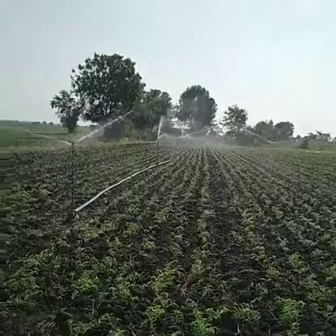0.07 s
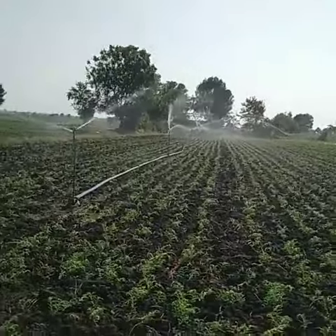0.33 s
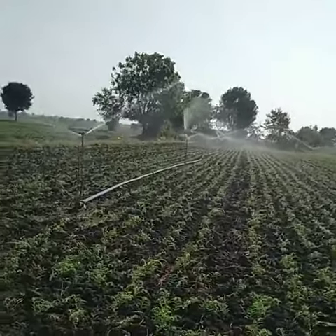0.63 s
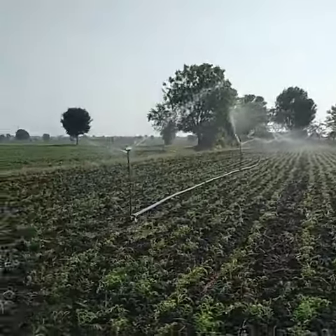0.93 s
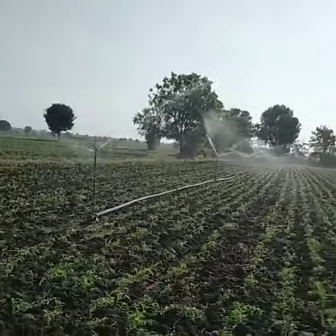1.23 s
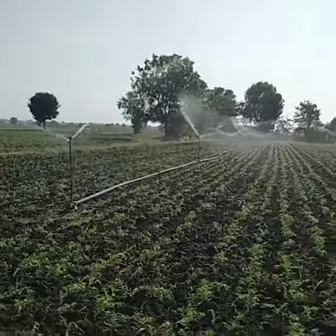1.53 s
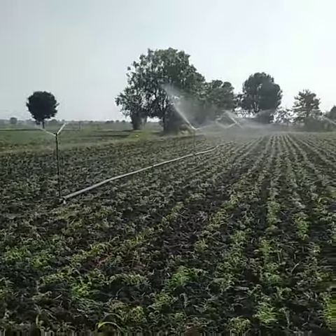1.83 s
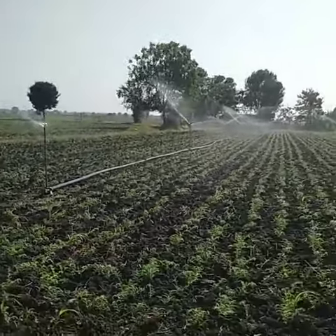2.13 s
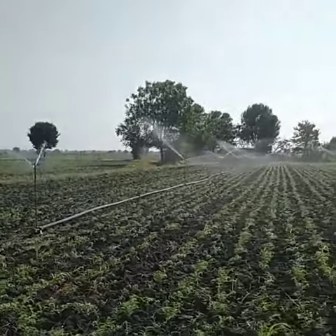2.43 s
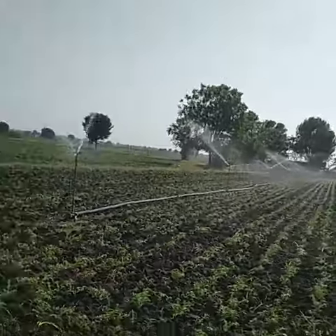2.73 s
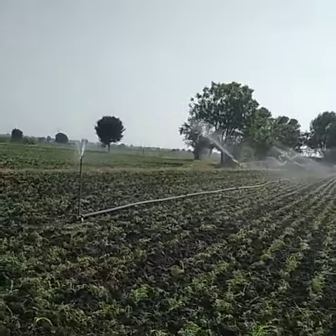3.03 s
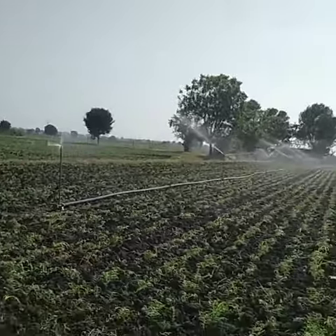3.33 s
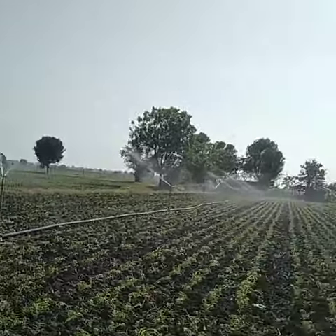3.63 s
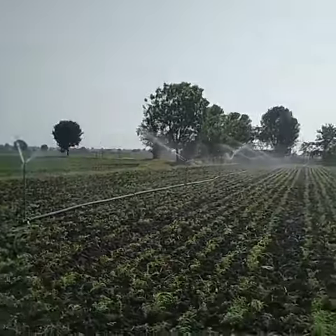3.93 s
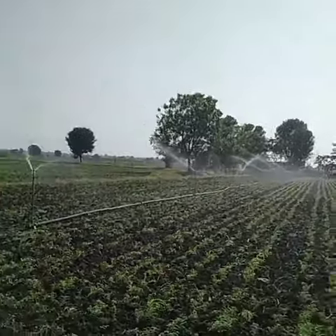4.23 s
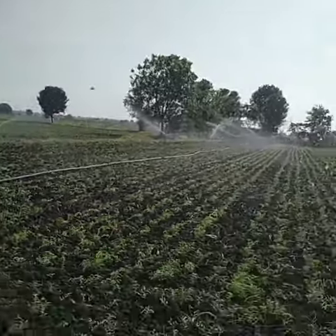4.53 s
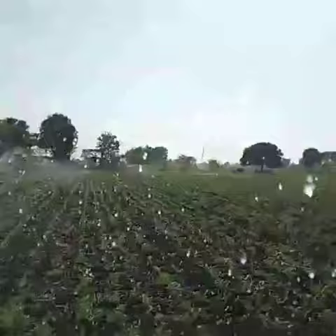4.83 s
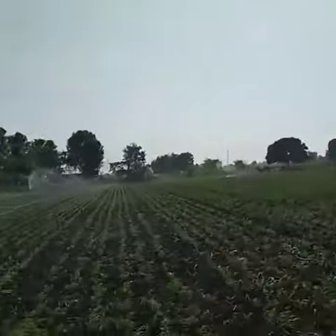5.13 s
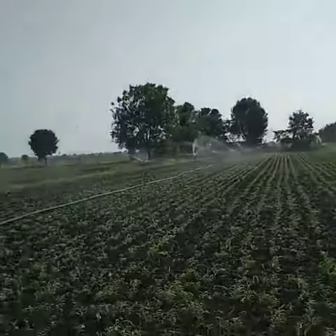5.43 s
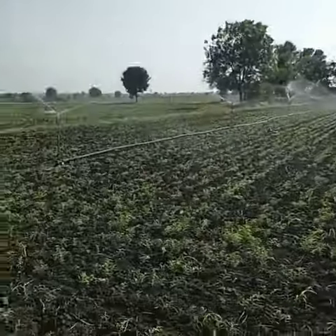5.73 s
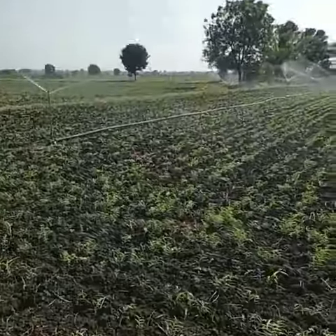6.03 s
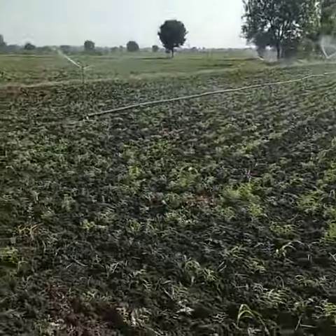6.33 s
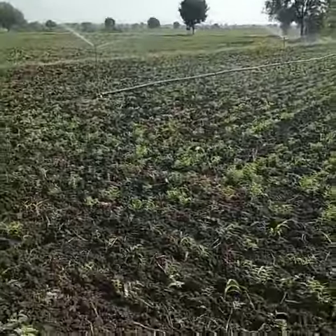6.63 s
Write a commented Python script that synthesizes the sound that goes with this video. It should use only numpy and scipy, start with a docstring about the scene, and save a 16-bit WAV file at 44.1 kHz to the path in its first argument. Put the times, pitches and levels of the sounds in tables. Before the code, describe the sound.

Outdoors in a crop field, gusts of wind rumble and thump on the microphone. Beneath them a sprinkler ticks about four times a second, each tick followed by a short spurt of spray, over a faint wash from distant sprinklers. Later a jet sweeps past, pattering on the leaves, and a few big drops land right by the microphone. The patter fades, with soft rustles and one more gust.

```python
"""Gusts of wind rumble on the microphone while an impact sprinkler chops away over a crop field.
Its swing arm slaps into the jet about four times a second, each slap followed by a burst of spray,
over the smooth wash of the far sprinklers. A jet sweeps past, pattering on the leaves, and a few
big drops land very close with a thud and a sharp tick. Soft rustles and one faint plop sit underneath."""
import sys
import numpy as np
from scipy import signal
from scipy.fft import rfft, irfft, next_fast_len
from scipy.io import wavfile
from scipy.ndimage import uniform_filter1d

SR = 44100
rng = np.random.default_rng(int(sys.argv[2]) if len(sys.argv) > 2 else 0)


def master_out(mix):
    """Clip the mix to full scale and print it as 16-bit PCM to the path in sys.argv[1]."""
    frames = np.transpose(np.atleast_2d(mix))
    ceiling = np.clip(frames, -1, 1)
    pcm = np.round(ceiling * 32767).astype(np.int16)
    wavfile.write(sys.argv[1], SR, pcm)


N = 303849
TIME = np.arange(N) / SR


def amp(db):
    """Decibels to gain."""
    return 10 ** (np.asarray(db) / 20)


def unit(x):
    """Scales to an rms of one."""
    return x / np.sqrt(np.mean(x ** 2) + 1e-20)


def add(mix, start_s, sound):
    """Lays a sound into the mix."""
    part = mix[round(start_s * SR):][:len(sound)]
    part += sound[:len(part)]


def colour(x, spectrum):
    """Equalises x with a curve of (Hz, dB) points on a log-frequency axis, to an rms of one."""
    size = next_fast_len(len(x), True)
    hz, db = np.transpose(spectrum)
    curve_db = np.interp(np.log(np.fft.rfftfreq(size, 1 / SR) + 1), np.log(hz + 1), db)
    return unit(irfft(rfft(x, size) * amp(curve_db), size)[:len(x)])


def noise(spectrum):
    """Coloured noise at an rms of one."""
    return colour(rng.standard_normal(N), spectrum)


def drift(hz):
    """A random wobble at an rms of one, up to about hz changes a second."""
    size = next_fast_len(N, True)
    lowpass = np.exp(-(np.fft.rfftfreq(size, 1 / SR) / hz) ** 2)
    return unit(irfft(rfft(rng.standard_normal(size)) * lowpass, size)[:N])


def swell(peak_s, half_width_s):
    """A bell-shaped fade in and out."""
    return np.exp(-2 * np.minimum(((TIME - peak_s) / half_width_s) ** 2, 20))


def impacts(per_s, spread_db, size=N):
    """A random train of impulses: many small, a few large."""
    height = amp(spread_db * np.minimum(rng.exponential(1, size), 4))
    return unit(height * rng.choice([-1, 1], size) * (rng.random(size) < per_s / SR))


def passing_jet_gain():
    """The water from a sweeping jet grows louder until it is nearest, then dies away."""
    nearest_s, peak_db = 5.104, -44.5
    approach_db_per_s, retreat_db_per_s = 7.5, 11.2
    before, after = np.maximum(nearest_s - TIME, 0), np.maximum(TIME - nearest_s, 0)
    return amp(peak_db - approach_db_per_s * before - retreat_db_per_s * after)


# The tone of the far sprinklers and the open field. Each row: frequency in Hz, relative level in dB.
FIELD_EQ = [(30, 16), (105, 5.5), (135, 7.5), (280, -3.5), (500, 3), (800, 1), (1150, 2.5), (1500, 0.5),
            (2100, 3.5), (2800, -3), (5500, -8), (7000, -9), (8000, -3.5), (9500, -7), (14000, -10)]


def field_wash():
    """Far spray merges into a wash, which swells as the jet passes and its core splashes on the soil."""
    far_spray = amp(-61)
    jet_core = amp(-52) * swell(peak_s=4.97, half_width_s=0.23)
    jet_spray = amp(-15) * passing_jet_gain()
    level = np.sqrt(far_spray ** 2 + jet_core ** 2 + jet_spray ** 2)
    return noise(FIELD_EQ) * level * amp(1.36 * drift(hz=24.9))


# The dull and the bright layer of a rustle. Each row: frequency in Hz, relative level in dB.
SCUFF_EQ = [(150, 2), (600, 3.5), (1200, 2.5), (2200, -7.5), (3500, -13.5), (8000, -20)]
HISS_EQ = [(1500, -5), (2200, -2), (5500, -2), (8200, 5.5), (11000, 5), (14000, 0)]
# Soft rustles close by. Each row: peak time in seconds, half-width in seconds, scuff in dB, hiss in dB.
RUSTLE_CUES = [(1.154, 0.16, -62, -69), (3.264, 0.17, -59, -69), (3.271, 0.01, -52.5, -74),
               (5.604, 0.14, -60, -75), (6.22, 0.1, -62.5, -53), (6.805, 0.062, -56.5, -51)]


def rustles():
    """Brief soft rubbing: a dull scuff with a hiss on top."""
    scuff = sum(amp(db) * swell(peak_s, width) for peak_s, width, db, _ in RUSTLE_CUES)
    hiss = sum(amp(db) * swell(peak_s, width) for peak_s, width, _, db in RUSTLE_CUES)
    return scuff * noise(SCUFF_EQ) + hiss * noise(HISS_EQ)


# One faint hollow plop: start in seconds, pitch in Hz, relative level in dB, decay in seconds.
PLOP_CUE = (.443, 1080, -44.5, .005)


def plop():
    """A short ring, roughened by a fast wobble in pitch and level."""
    start_s, hz, db, decay_s = PLOP_CUE
    age = np.clip((TIME - start_s) / decay_s, 0, 40)
    cycles = np.cumsum(hz * (1 + 0.04 * drift(hz=400))) / SR
    rough_gain = amp(db - 0.5 + 8.9 * drift(hz=121))
    return rough_gain * age * np.exp(1 - age) * np.sin(2 * np.pi * cycles)


# The rumble of wind at an eddy speed of one. Each row: frequency in Hz, relative level in dB.
RUMBLE_EQ = [(8, -15), (25, -1.5), (60, 1), (110, 0.5), (180, -7), (260, -22.5), (400, -33), (700, -46),
             (1500, -74), (4000, -100)]


def eddies(speed, size=N):
    """Turbulence of steady strength: vortices thump over a finer swirl; faster ones sound higher."""
    vortices = impacts(per_s=130 * speed, spread_db=4, size=size)
    swirl = amp(-7.5) * rng.standard_normal(size)
    rumble = colour(vortices + swirl, [(hz * speed, db) for hz, db in RUMBLE_EQ])
    local_power = uniform_filter1d(uniform_filter1d(rumble ** 2, size=2000), size=1500)
    return rumble / np.sqrt(abs(local_power) + 1e-9)


# Gusts of wind. Each row: start in seconds, length in seconds, relative level in dB.
GUST_CUES = [(-.02, 0.072, -32.5), (0.141, 0.32, -32), (0.504, 0.032, -31), (0.573, 0.17, -38.5),
             (0.7, 0.372, -35.5), (1.152, 0.11, -28), (1.43, 0.46, -27.5), (2.017, 0.42, -26.5),
             (2.451, 0.095, -36), (2.841, .27, -30.5), (3.357, 0.1, -39), (3.56, 0.22, -35.5),
             (4.186, 0.2, -35.5), (4.422, .11, -36), (4.715, 0.38, -34), (5.09, 0.16, -46),
             (5.386, .19, -38.5), (6.238, 0.054, -44), (6.721, 0.28, -28)]


def wind_strength_db():
    """Gusts rise quickly, sag a little and die away, on top of a steadily slackening breeze."""
    breeze_db, slacken_db_per_s = -45, 1.47
    rise_s, sag_db, release_s = 0.025, 3, 0.028
    power = amp(breeze_db - slacken_db_per_s * TIME) ** 2
    for start_s, length_s, db in GUST_CUES:
        age = TIME - start_s
        attack = np.clip(age / rise_s, 0, 1)
        held = amp(db - sag_db * np.clip(age / length_s, 0, 1))
        release = np.exp(-np.maximum(age - length_s, 0) / release_s)
        power += (attack * held * release) ** 2
    return 10 * np.log10(power)


# Sudden buffets of wind. Each row: peak time in seconds, level in dB, half-width in seconds,
# eddy speed as a factor on the rumble's pitch.
BUFFET_CUES = [(1.193, -26, 0.034, 1.38), (1.569, -31.5, .04, 1.48), (1.696, -31.5, 0.0079, 2),
               (2.129, -19, 0.031, 1.42), (2.154, -31.5, 0.02, 2.89), (2.34, -30.5, 0.11, 1.3),
               (2.699, -26, 0.013, 1.04), (3.642, -27, 0.016, 0.47), (4.315, -29.5, 0.04, 0.99),
               (4.898, -23, 0.0083, 1.1), (5.403, -24, 0.009, 1.07), (5.445, -35.5, .025, 1.4),
               (6.745, -29, 0.012, 1.53)]


def wind():
    """Wind on the microphone: the stronger the gust, the more of it is in fast, fluttering eddies."""
    strength_db = wind_strength_db()
    fast_share = np.clip((strength_db + 52.5) / 27, 0, 1) ** 2.1
    fast = eddies(speed=1.022) * amp(1.9 * drift(hz=48.6))
    slow = eddies(speed=0.58)
    rumble = amp(strength_db - 1.04) * (np.sqrt(1 - fast_share) * slow + np.sqrt(fast_share) * fast)
    t = np.arange(-0.25, 0.25, 1 / SR)
    for peak_s, db, half_width_s, speed in BUFFET_CUES:
        bell = np.exp(-2 * (t / half_width_s) ** 2)
        add(rumble, peak_s + t[0], amp(db) * bell * eddies(speed, size=len(t)))
    return rumble


# The tone of water falling on the near leaves. Each row: frequency in Hz, relative level in dB.
LEAF_EQ = [(300, -14), (600, -10), (1100, -8.5), (1500, -12.5), (2000, -13.5), (2700, -14.5), (4500, -11.5),
           (6400, -6), (7200, -3), (7900, 2), (9100, -3), (11500, -1), (13000, 1.5), (13900, 3.5)]


def leaf_patter():
    """Drops tick on the leaves in clumps, at assorted pitches, and throw a brief fizz of splashes."""
    tick_decay_s, splash_decay_s, drizzle_db = 0.0002, 0.0024, -63
    clumps = impacts(per_s=2400, spread_db=4) * amp(1.6 * drift(hz=109))
    big_strays = amp(-12) * impacts(per_s=44, spread_db=1.3)
    hits = clumps + big_strays
    splash_power = signal.lfilter([1], [1, -np.exp(-1 / (splash_decay_s * SR))], hits ** 2)
    fizz = unit(np.sqrt(splash_power) * rng.standard_normal(N))
    pitches_hz = np.linspace(1200, 13600, num=9)
    leaf = rng.integers(0, len(pitches_hz), N)
    t = np.arange(64) / SR
    rings = np.exp(-t / tick_decay_s) * np.cos(2 * np.pi * pitches_hz[:, None] * t)
    ticks = sum(signal.oaconvolve(hits * (leaf == k), ring)[:N] for k, ring in enumerate(rings))
    patter = colour(unit(ticks) + amp(-4) * fizz, LEAF_EQ)
    return np.hypot(passing_jet_gain(), amp(drizzle_db)) * patter


# The crack on each thud. Each row: frequency in Hz, relative level in dB, decay in seconds.
CRACK_MODES = [(2260, -4.5, 0.00074), (4500, -4.5, .0003), (7600, 5, 0.00015)]
# The splash of a close drop. Each row: frequency in Hz, relative level in dB.
SPLASH_EQ = [(2500, -11), (5500, -10.5), (8000, -5), (10000, 2), (13500, 1)]
# Single close drops. Each row: start in seconds, relative tick level in dB, relative thud level in dB,
# tick pitch in Hz, thud pitch in Hz.
DROP_CUES = [(1.203, -26.5, -58, 10000, 471), (1.7483, -29, -66, 8360, 452), (2.3379, -31, -72, 9600, 468),
             (3.71, -25, -64, 9000, 918), (4.5115, -25, -74, 11500, 781), (4.5252, -20, -72, 10400, 549),
             (4.7731, -3.5, -37.5, 11900, 2180), (4.8319, -34, -40, 8600, 2170),
             (4.8707, -13, -33, 6070, 616), (4.9313, -5.5, -52, 9400, 452), (5.1741, -17, -74, 10500, 918),
             (5.2051, -47, -49, 7450, 2180), (5.232, -15.5, -72, 9800, 2100),
             (5.3607, -19, -74, 9500, 2080), (5.4026, -15, -70, 8400, 466), (5.6296, -20, -56, 11000, 1140),
             (5.7418, -23, -74, 12300, 1890), (5.792, -27, -54.5, 8500, 692)]


def near_drops():
    """A big drop lands with a wet thud; its rim then breaks up with a sharp tick and a tiny splash."""
    breakup_s, tick_rise_s, splash_decay_s = 0.0005, 0.00009, 0.00086
    t = np.arange(700) / SR
    crack = sum(amp(db) * np.exp(-t / decay) * np.sin(2 * np.pi * hz * t)
                for hz, db, decay in CRACK_MODES)
    tick_shape = t / tick_rise_s * np.exp(1 - t / tick_rise_s)
    fizz = noise(SPLASH_EQ)
    drops = np.zeros(N)
    for start_s, tick_db, thud_db, tick_hz, thud_hz in DROP_CUES:
        thud = np.exp(-t * thud_hz / 0.37) * np.sin(2 * np.pi * thud_hz * t)  # dies in about a cycle
        tick = tick_shape * np.sin(2 * np.pi * tick_hz * t)
        splash = fizz[round(start_s * SR):][:len(t)] * np.exp(-t / splash_decay_s)
        add(drops, start_s, amp(thud_db) * (amp(12) * thud + amp(11) * crack))
        add(drops, start_s + breakup_s, amp(tick_db) * (amp(-8) * tick + amp(-12) * splash))
    return drops


# The tone of the arm's slap and of its spray. Each row: frequency in Hz, relative level in dB.
SLAP_EQ = [(700, -15.5), (1100, -14), (1500, -13.5), (2150, 0), (2650, -13), (3000, -8), (3500, -10),
           (4500, -15), (5600, -18), (14000, -20.5)]
SPRAY_EQ = [(800, -8), (1500, -10.5), (2100, -1.5), (3000, -2.5), (3800, -6.5), (4800, -5), (5600, -11),
            (7000, -4), (8200, 1), (9700, -5.5), (12400, -1), (14000, -8.5)]
# The strokes soften as the head turns away.
# Each row: time in seconds, relative slap level in dB, relative spray level in dB.
STROKE_LEVELS = [(0.1, -56, -55.5), (1.3, -54.5, -58), (2.6, -56.5, -63), (3.7, -60, -59.5),
                 (4.4, -57, -61.5), (6.6, -61.5, -60.5)]


def sprinkler():
    """On a steady beat the arm slaps into the jet, which sputters into spray until the arm swings out."""
    first_stroke_s, period_s, spread_db = 0.094, 0.2389, 1.5
    slap_rise_s, slap_decay_s = 0.0031, 0.0098
    spray_rise_s, spray_hold_s, spray_release_s = 0.0036, 0.031, 0.017
    age = np.arange(SR // 4) / SR
    slap_shape = (1 - np.exp(-age / slap_rise_s)) * np.exp(-age / slap_decay_s)
    spray_release = np.exp(-np.maximum(age - spray_hold_s, 0) / spray_release_s)
    spray_shape = (1 - np.exp(-age / spray_rise_s)) * spray_release
    times, slap_db, spray_db = np.transpose(STROKE_LEVELS)
    slap_gain, spray_gain = np.zeros((2, N))
    for start_s in np.arange(first_stroke_s, N / SR, period_s):
        luck_db = spread_db * rng.standard_normal(2)
        add(slap_gain, start_s, amp(np.interp(start_s, times, slap_db) + luck_db[0]) * slap_shape)
        add(spray_gain, start_s, amp(np.interp(start_s, times, spray_db) + luck_db[1]) * spray_shape)
    droplets = colour(impacts(per_s=8200, spread_db=4), SPRAY_EQ)
    sputter = amp(2 * drift(hz=130))
    return amp(8.5) * slap_gain * noise(SLAP_EQ) + amp(3) * spray_gain * droplets * sputter


def scene():
    """Everything in the open air, in one channel."""
    return (field_wash() + sprinkler() + leaf_patter() + near_drops() + wind() + rustles() + plop())[None]


def record(dry):
    """A steep low-pass trims the top end."""
    lowpass = signal.firwin(801, cutoff=14020, window=("kaiser", 7), fs=SR)
    return signal.oaconvolve(dry, lowpass[None], "same")


dry = scene()
out = record(dry)
master_out(out)
```